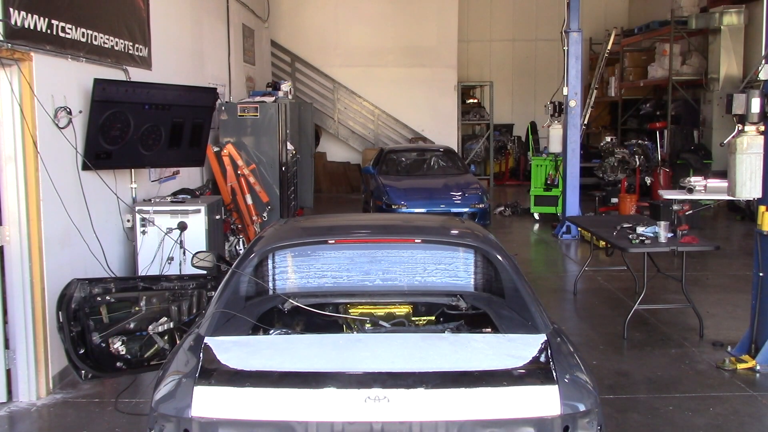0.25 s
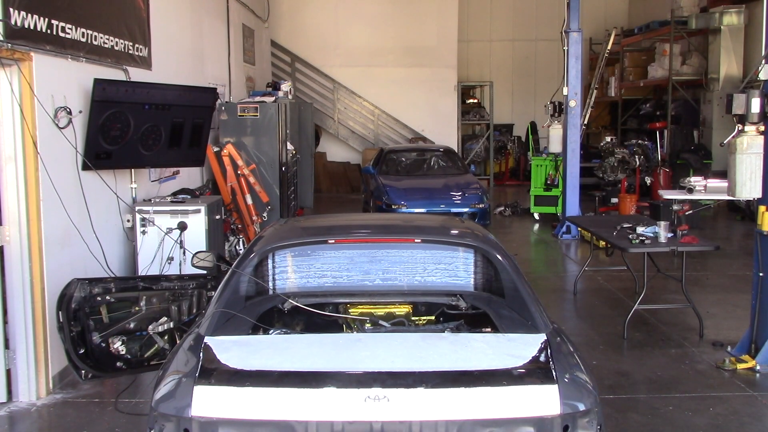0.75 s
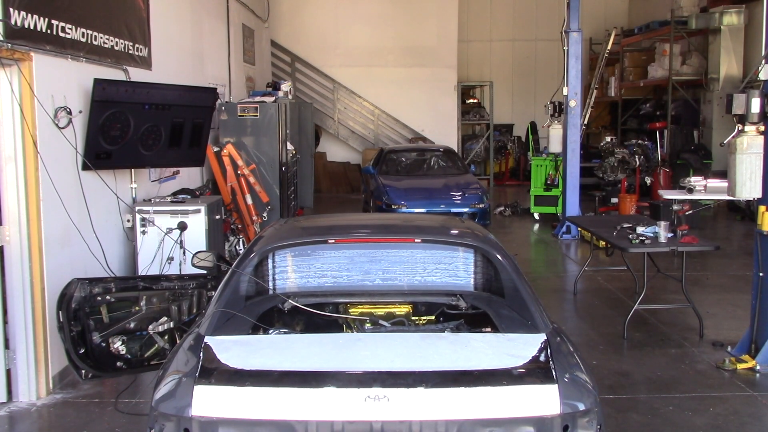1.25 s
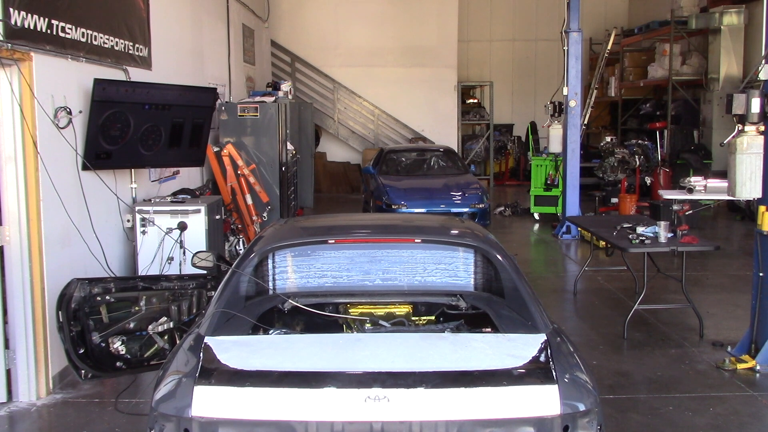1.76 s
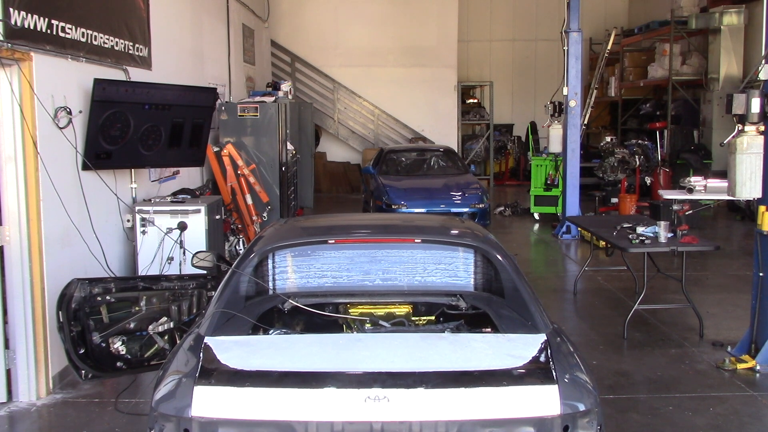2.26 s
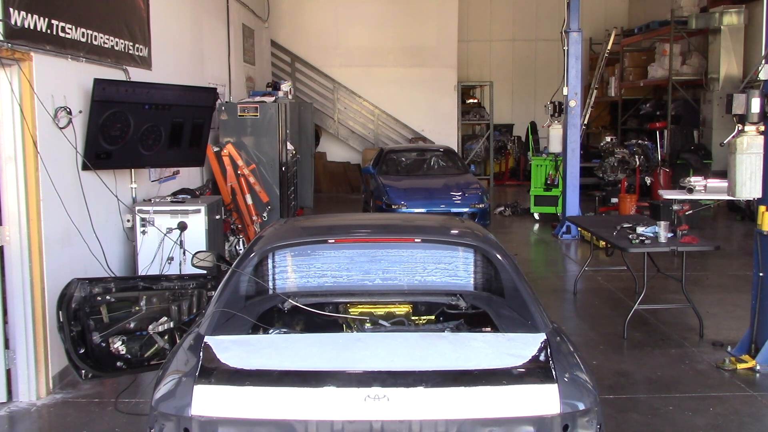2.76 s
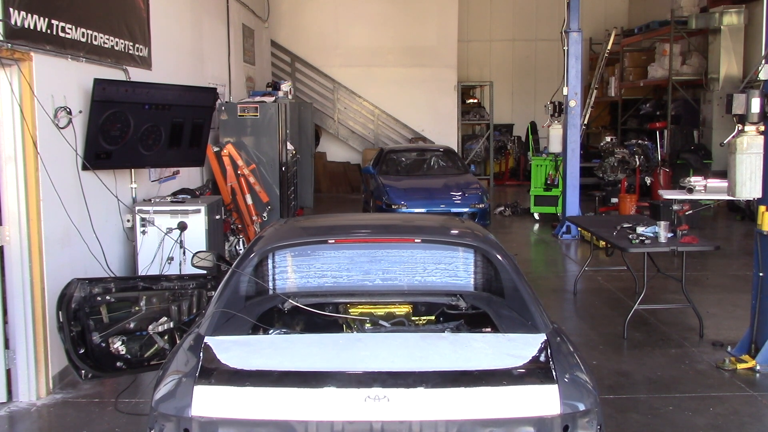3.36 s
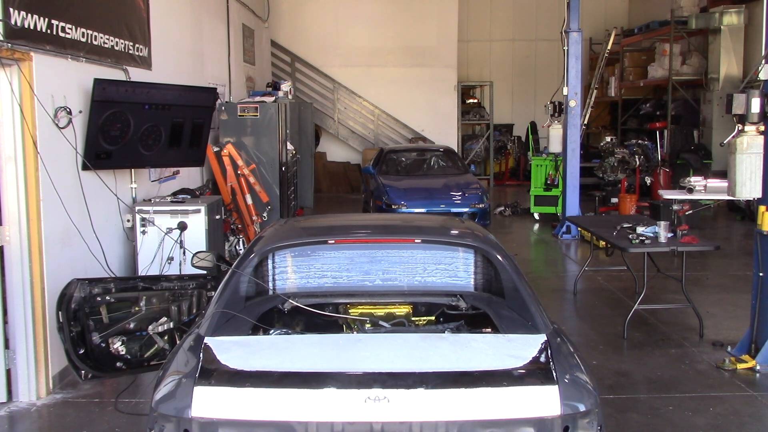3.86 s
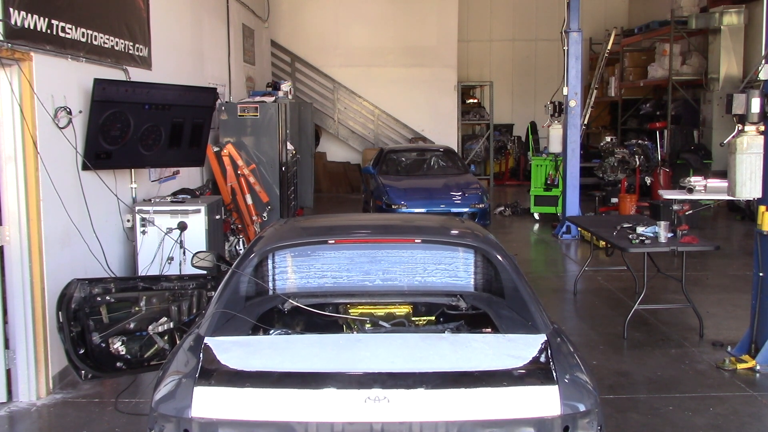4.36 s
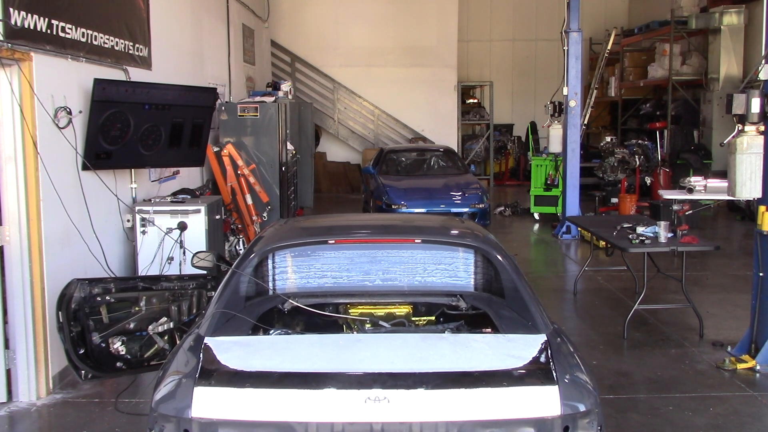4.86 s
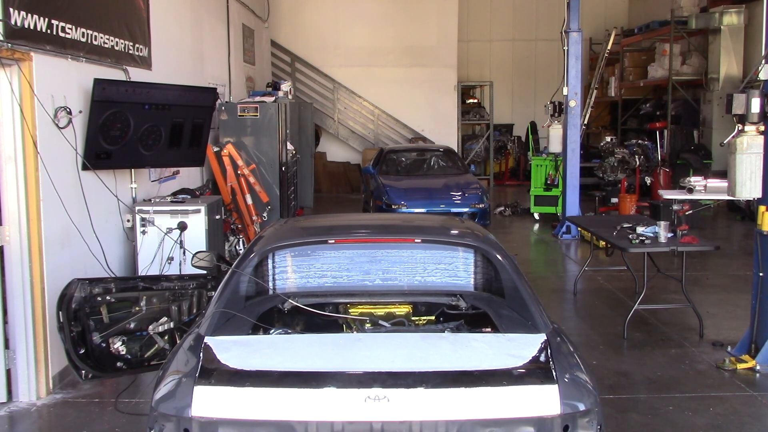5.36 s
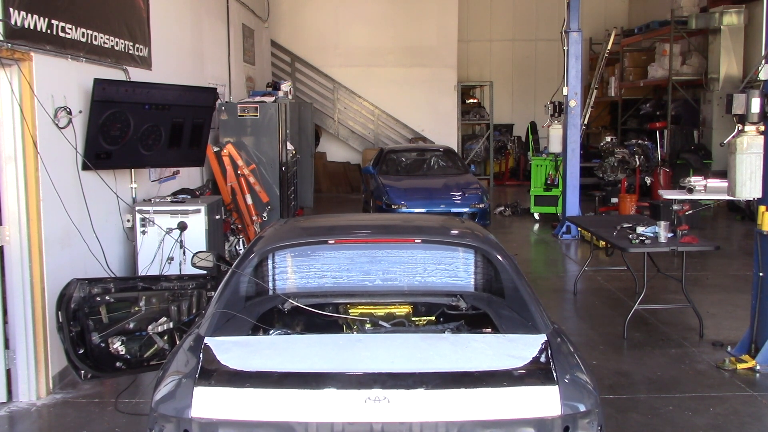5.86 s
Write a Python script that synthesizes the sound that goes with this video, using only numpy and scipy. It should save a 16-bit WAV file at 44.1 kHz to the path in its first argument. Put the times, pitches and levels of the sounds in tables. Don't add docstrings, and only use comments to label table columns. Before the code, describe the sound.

A six-cylinder sports car on workshop rollers revs, climbs to a rasping roar, drops away with a pop, then stabs upward again.

```python
import sys
import numpy as np
from scipy import signal
from scipy.fft import rfft, irfft, next_fast_len
from scipy.io import wavfile
from scipy.ndimage import uniform_filter1d, map_coordinates

SR = 44100
rng = np.random.default_rng(int(sys.argv[2]) if len(sys.argv) > 2 else 0)


def convert_level_to_amplitude(level_db):
    exponent = np.asarray(level_db, float) / 20
    return 10 ** exponent


def transcribe(signal):
    frames = np.atleast_2d(signal).T
    limited = np.clip(frames, -1, 1)
    pcm = np.round(limited * 32767).astype(np.int16)
    wavfile.write(sys.argv[1], SR, pcm)


N = 269451
T_S = np.arange(N) / SR
HOP = 32
CRUISE_RATE_HZ = 110

# frequency in Hz, level in dB per Hz.
GAS = [(380, -6), (650, -5), (900, -4), (1400, -3), (2100, -6), (3200, -14.5), (5300, -24.5), (10000, -53),
       (15800, -45)]


def unit(x):
    return x / np.sqrt(np.mean(x ** 2) + 1e-20)


def curve(rows):
    s, values = np.transpose(rows)
    return np.interp(T_S, s, values)


def stretch(x):
    return np.interp(np.arange(N), np.arange(len(x)) * HOP, x)


def wobble(rate_hz):
    knots = rng.standard_normal(int(N * rate_hz / SR) + 4)
    return stretch(map_coordinates(knots, [np.arange(0, N, HOP) * rate_hz / SR]))


def hump(t, centre_s, half_s):
    return np.exp(-((t - centre_s) / half_s) ** 2)


def filtered(x, response):
    m = next_fast_len(N + 8192)
    return irfft(rfft(x, m) * response(np.fft.rfftfreq(m, 1 / SR)), m)[:N]


def noise(spectrum):
    hz, db = np.transpose(spectrum)
    gain = lambda f: convert_level_to_amplitude(np.interp(np.log(f + 1), np.log(hz + 1), db))
    return unit(filtered(rng.standard_normal(N), gain))


def crank():
    # time in seconds, firings per second.
    speed = [(0.0, 92.8), (0.31, 107.2), (0.91, 99.2), (1.32, 62.6), (1.55, 76.8), (2.55, 129.1),
             (3.12, 158.2), (3.35, 168.9), (4.26, 83.2), (4.55, 63.2), (4.61, 66.2), (5.02, 59.6),
             (5.13, 59.1), (5.28, 115.7), (5.41, 140.6), (5.83, 109.2), (5.91, 115.9), (6.11, 115.4)]
    s, rates = np.transpose(speed)
    slope = np.gradient(rates, s)
    i = np.clip(np.searchsorted(s, T_S) - 1, 0, len(s) - 2)
    span = s[i + 1] - s[i]
    u = (T_S - s[i]) / span
    rate = rates[i] + (rates[i + 1] - rates[i]) * u * u * (3 - 2 * u)
    rate += span * u * (1 - u) * (slope[i] * (1 - u) - slope[i + 1] * u)
    surge_hz, period_s, peak_s, mid_s, half_s = 1.9, 0.381, 2.337, 2.04, 1.15
    swing = np.cos(2 * np.pi * (T_S - peak_s) / period_s)
    rate += surge_hz * swing * np.exp(-((T_S - mid_s) / half_s) ** 4)
    return rate, 2 * np.pi * np.cumsum(rate) / SR


def silencer(f):
    # frequency in Hz, width in Hz, level in dB.
    resonances = [(59.13, 14.8, 11), (126, 154, -7.5), (149.7, 11.5, -2), (176.6, 43, -4.5),
                  (221, 24.3, -9), (336.6, 51, -2), (459.6, 84.7, 4), (600, 58, -3), (688, 56, -9.5),
                  (843, 59, -10.5), (1030, 330, -15), (1430, 850, -24.5)]
    power = sum(convert_level_to_amplitude(db) ** 2 / (1 + ((f * f - hz * hz) / (w * f + 1e-9)) ** 2) ** 2
                for hz, w, db in resonances)
    return np.sqrt(power)


def ragged(db):
    return convert_level_to_amplitude(db * hump(T_S, 5.42, 0.25))


def boom():
    # frequency in Hz, level in dB per Hz.
    hall = [(10, -36), (22, -21), (35, -4.5), (50, -6), (66, -13.5), (80, -12), (95, -28), (300, -34.5),
            (700, -47), (1200, -120)]
    # centre in seconds, half length in seconds, level over the rumble in dB.
    shudders = [(0.102, 0.033, 0), (1.12, 0.24, 6.5), (1.617, 0.14, 7), (2.9, 0.21, 12), (3.166, 0.13, 3),
                (3.316, 0.036, 4), (3.6, 0.32, 13), (4.05, 0.2, 6), (4.49, 0.11, 8.5), (4.903, 0.28, 2),
                (5.31, 0.079, 7), (5.553, 0.26, 9.5), (6.09, 0.12, 3)]
    rumble_db, swing_db = -35.5, 2
    shudder_db = sum(db * hump(T_S, s, half_s) for s, half_s, db in shudders)
    return convert_level_to_amplitude(rumble_db + shudder_db + swing_db * wobble(8.3)) * noise(hall)


def fan():
    # frequency in Hz, level in dB per Hz.
    fan_spectrum = [(85, -40), (130, 6), (226, 2), (376, -28), (564, -1), (850, -22.5), (1100, -24),
                    (1550, -15), (2100, -27.5), (4000, -41.5), (8800, -33), (15800, -41)]
    return convert_level_to_amplitude(-45) * noise(fan_spectrum)


def rollers():
    level_db, from_s, spin_up_s = -43, 1.3, 2.6
    return convert_level_to_amplitude(level_db) * np.clip((T_S - from_s) / spin_up_s, 0, 1) * noise(GAS)


def gas_flow():
    # frequency in Hz, level in dB per Hz.
    hiss_spectrum = [(1200, -120), (2500, 1), (4000, -0.5), (6500, -4.5), (8600, -9.5), (9600, -13),
                     (13000, -13.5), (15800, -20.5)]
    gas_db, gas_db_per_octave = -45, 10.7
    hiss_db, hiss_db_per_octave = -50.5, 10.9
    lag_s = 0.072
    rate, turn = crank()
    keep = np.exp(-1 / (lag_s * SR))
    trailing = signal.lfilter([1 - keep], [1, -keep], rate - rate[0]) + rate[0]
    flow_octaves = np.log2(np.maximum(rate, trailing) / CRUISE_RATE_HZ)
    pulse = unit(1 + 0.082 * np.cos(turn))
    gas = convert_level_to_amplitude(gas_db + gas_db_per_octave * flow_octaves + 1.1 * wobble(7.9)) * pulse * noise(GAS)
    hiss = convert_level_to_amplitude(hiss_db + hiss_db_per_octave * flow_octaves + 0.8 * wobble(18)) * noise(hiss_spectrum)
    return gas * ragged(2.5) + hiss


def off_walls(air):
    # delay in seconds, level in dB.
    surfaces = [(.0014, -49.5), (.0052, -25.5), (.0093, -14.5), (0.0151, -22.5), (0.0238, -18.5)]
    return air + sum(convert_level_to_amplitude(db) * np.roll(air, round(s * SR)) for s, db in surfaces)


def ticks():
    # start in seconds, peak in dB.
    clicks = [
        (4.6354, -39),
        (4.7694, -43),
    ]
    out, t = np.zeros(N), np.arange(SR // 20) / SR
    for s, db in clicks:
        grains = np.diff(rng.standard_normal(len(t) + 1))
        out[round(s * SR):][:len(t)] += convert_level_to_amplitude(db - 15 - 60 * t / 0.05) * grains
    return out


def belt():
    # start in seconds, length in seconds, start pitch in Hz, fall in Hz, peak in dB.
    chirps = [
        (3.79, 0.11, 14150, 600, -44),
        (5.08, .07, 15600, 2050, -47),
    ]
    peak_share, fade_db = 0.5, 30
    out = np.zeros(N)
    for s, length_s, hz, fall_hz, db in chirps:
        u = np.clip((T_S - s) / length_s, 0, 1)
        shape_db = np.interp(u, [0, peak_share, 1], [-fade_db, 0, -fade_db])
        pitch_hz = hz - fall_hz * u ** 2.2 + 190 * wobble(500)
        level = (u > 0) * (u < 1) * convert_level_to_amplitude(db + shape_db + 3.5 * wobble(176))
        out += level * np.sin(2 * np.pi * np.cumsum(pitch_hz) / SR)
    return out


def vent():
    # peak in seconds, rise in seconds, fall in seconds, level in dB.
    vents = [
        (3.7, .16, .32, -48.5),
        (5.24, 0.27, 0.28, -52),
    ]
    # frequency in Hz, level in dB per Hz.
    jet_spectrum = [(2000, -120), (4000, -2), (8200, 2), (12000, -7), (15800, -10)]
    fade_db = 20
    jet = sum(convert_level_to_amplitude(db - fade_db * np.maximum((s - T_S) / rise_s, (T_S - s) / fall_s))
              for s, rise_s, fall_s, db in vents)
    return jet * convert_level_to_amplitude(1.2 * wobble(25)) * (noise(jet_spectrum) + convert_level_to_amplitude(7) * noise(GAS))


def pops():
    # start in seconds, peak in dB.
    bursts = [(1.833, -26), (1.868, -29), (3.665, -22), (5.19, -27), (5.231, -17.5), (5.253, -21),
              (5.272, -23), (5.288, -20), (5.33, -21), (5.37, -25)]
    out, t = np.zeros(N), np.arange(SR // 10) / SR
    for s, db in bursts:
        envelope = convert_level_to_amplitude(db + 7.5 - 60 * t / 0.07) * (1 - np.exp(-t / 0.003))
        out[round(s * SR):][:len(t)] += envelope * rng.standard_normal(len(t))
    return filtered(out, lambda f: silencer(f) * (f > 260) + convert_level_to_amplitude(-43.5) * (f > 600) / (1 + f / 2500))


def exhaust():
    # time in seconds, level in dB.
    throttle = [(0, -8.5), (.88, -7), (1.0, -4.5), (1.18, -6.5), (1.36, 3), (1.5, 2), (2.7, -0.5),
                (3.05, 0), (3.42, -4.5), (3.68, 6), (4.27, -1), (4.47, 0), (4.66, -18.5), (4.96, -2),
                (5.1, -3), (5.17, 6), (5.8, -1), (6.11, 3)]
    # time in seconds, level in dB.
    banks = [(0, 2), (0.201, -6), (.55, 3), (.9, 7), (1.1, 1), (1.85, -3), (2.15, -3.5), (2.398, 3),
             (2.64, 4.5), (2.74, -8), (2.87, -2.5), (3.7, -22), (3.95, -9), (4.25, -1), (5.3, -8.5),
             (5.88, -19), (6, -22), (6.11, 0)]
    # time in seconds, level in dB.
    bite = [(0, -4), (.3, -2), (.6, -4), (.95, -1.5), (1.25, -9), (1.7, -9), (1.85, 9.5), (2.0, -1),
            (2.37, 9), (2.82, 4.5), (3.05, 14), (3.3, 8), (3.58, 14), (3.9, -2), (4.8, -25.5), (5.25, 10.5),
            (5.47, -5.5), (5.898, 2.5)]
    # multiple of the firing rate, level in dB, shares of throttle, banks and bite.
    firing = [(1, -23.5, 1.3, 0.0307, 0.0086), (2, -29, 0.41, 0.014, 0.38), (3, -38.5, 0.044, 0.0076, 0.98),
              (4, -37.5, .05, .01, .2), (5, -44, 0.06, .01, 0.61), (.5, -28.5, 0.013, 0.93, 0.0053),
              (1.5, -40.5, .01, 0.74, 0.95), (2.5, -43, .01, 1.9, 0.66), (3.5, -48.5, .01, 1.15, 1)]
    # multiple of the firing rate, level in dB.
    halves = [(4.5, -22), (5.5, -13), (6.5, -2)]
    # multiple of the firing rate, level in dB.
    others = [(1 / 3, -1.5), (4 / 3, -23), (5 / 3, -25), (8 / 3, -32), (17 / 6, -11), (19 / 6, -25),
              (10 / 3, -9.5), (5.5, 0.5), (7, -2), (5.6, -10), (9, -5), (8.1, -2.2), (21, 7.5), (15, 6.5)]
    # centre in seconds, half length in seconds, multiple of the
    # firing rate, level in dB.
    flares = [(.1, .12, 3, 8), (.95, .06, 3, 6), (.1, .15, 5, -8), (1.47, .04, 1, 4), (1.66, .11, 5, -10),
              (3.25, .08, 3, -4), (3.43, .07, 2, 6), (3.68, .05, 4, 15), (4.17, .05, 5, 10),
              (4.34, .09, 2, 8), (4.9, .25, 2, -12), (5.25, .05, 4, 8), (5.46, .1, 3, -8)]
    rasp_db, rasp_db_per_hz, rasp_bite_share = -44.5, 0.15, 0.27
    rough_db, rough_db_per_hz, rough_bite_share = -44, 0.17, 0.1
    overrun_db, overrun_hz_per_s = 5, 120
    rattle_db = 2

    rate, turn = crank()
    acceleration = np.gradient(rate) * SR
    throttle_db, banks_db, bite_db = curve(throttle), curve(banks), curve(bite)
    fall_db = overrun_db * np.clip(-acceleration / overrun_hz_per_s, 0, 1)
    scatter = 0.045 + 0.0006 * uniform_filter1d(np.abs(np.gradient(rate)) * SR, 2000)

    def line(k, shake_db):
        level = np.sqrt(2) * convert_level_to_amplitude(shake_db * wobble(14))
        jitter = scatter * 0.67 * np.sqrt(max(k - 0.85, 0)) * wobble(30)
        return level * np.sin(k * turn + rng.uniform(0, 2 * np.pi) + jitter)

    def colour(k):
        return stretch(silencer(k * rate[::HOP]))

    def weak(orders):
        return sum(convert_level_to_amplitude(db) * colour(k) * line(k, 2.6) for k, db in orders)

    main = np.zeros(N)
    for k, db, throttle_share, banks_share, bite_share in firing:
        level_db = db + throttle_share * throttle_db + banks_share * banks_db + bite_share * bite_db
        level_db = level_db - (k > 3) * fall_db
        slow_db = level_db[::HOP]
        for s, half_s, order, flare_db in flares:
            if round(order) == k:
                slow_db = slow_db + flare_db * hump(T_S[::HOP], s, half_s)
        shake_db = 0.17 * k + 0.2 + 0.9 * (k % 1 > 0) * (k > 1)
        main += stretch(convert_level_to_amplitude(slow_db)) * colour(k) * line(k, shake_db)

    rattle = convert_level_to_amplitude(rattle_db) * filtered(main ** 3, lambda f: silencer(f) * (f > 140))
    uneven_banks = convert_level_to_amplitude(-50 + 0.54 * banks_db + 0.95 * bite_db) * weak(halves)
    shaft = convert_level_to_amplitude(-15) * np.clip((rate - 130) / 20, 0, 1) * line(2 / 3, 5.3)
    extra_hz = rate - CRUISE_RATE_HZ
    rasp = convert_level_to_amplitude(rasp_db + rasp_db_per_hz * extra_hz + rasp_bite_share * bite_db) * (weak(others) + shaft)
    puffs = rng.standard_normal(N) * (1 + 0.86 * np.cos(turn))
    rough = unit(filtered(puffs, lambda f: silencer(f) * (f > 110)))
    rough *= convert_level_to_amplitude(rough_db + rough_db_per_hz * extra_hz + rough_bite_share * bite_db) * ragged(5)
    return main + rattle + uneven_banks + rasp + rough


def scene():
    air = off_walls(fan() + rollers() + gas_flow())
    return (boom() + air + ticks() + belt() + vent() + pops() + exhaust())[None]


def low_pass(x):
    return signal.sosfilt(signal.butter(12, 15780, fs=SR, output="sos"), x)


def record(dry):
    edge_s, top_hz = 0.006, 15780
    edge = np.clip(np.minimum(T_S, T_S[-1] - T_S) / edge_s, 0, 1)
    mix = filtered(dry[0] * edge, lambda f: f < top_hz)[None]
    return low_pass(mix)


dry = scene()
out = record(dry)
transcribe(out)
```